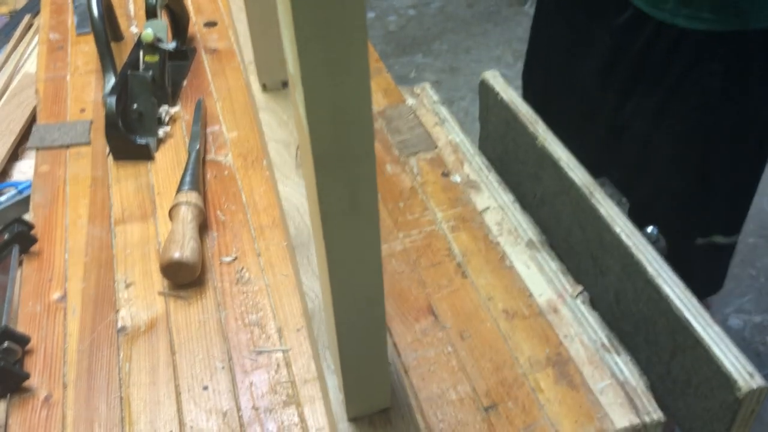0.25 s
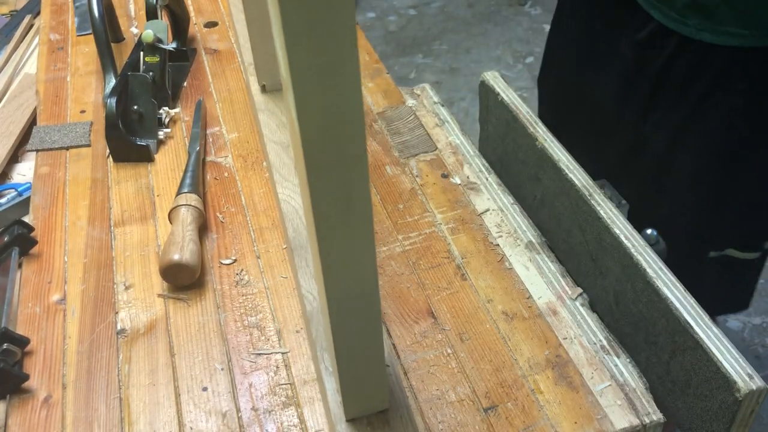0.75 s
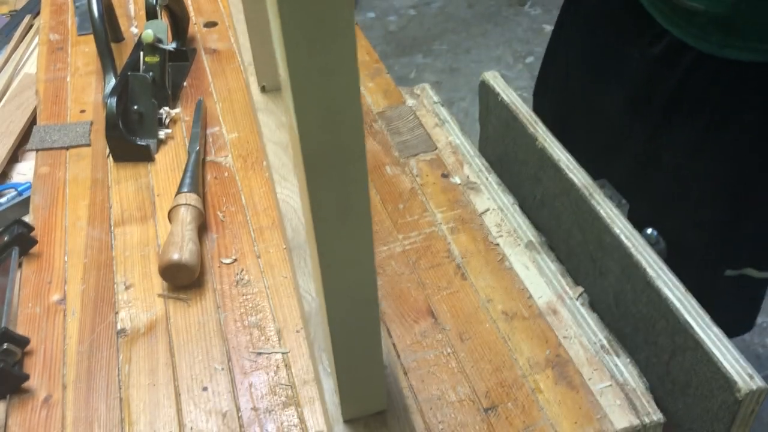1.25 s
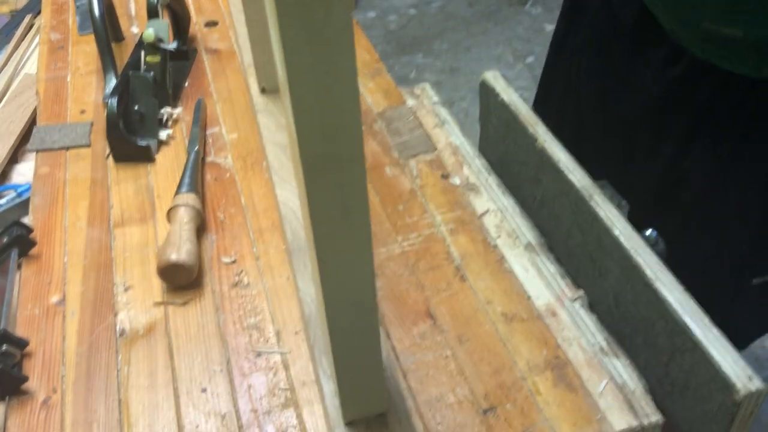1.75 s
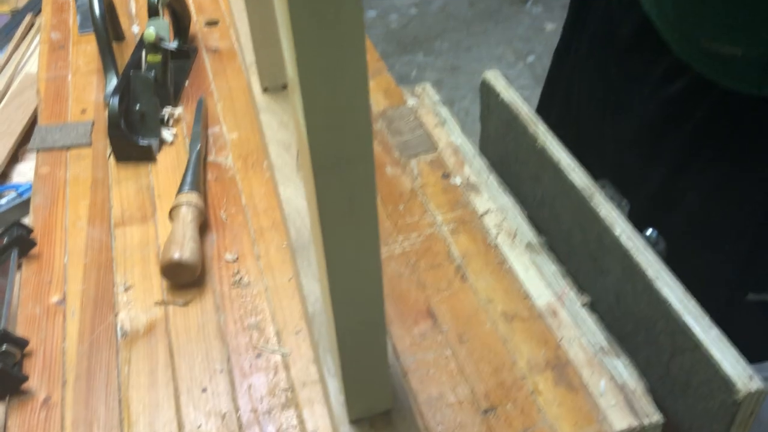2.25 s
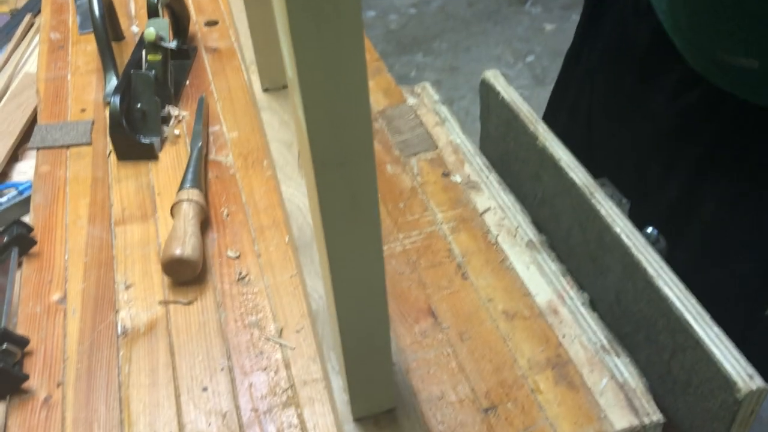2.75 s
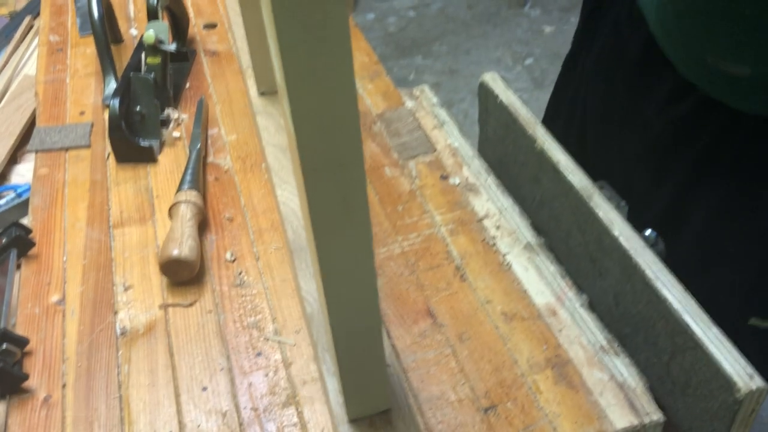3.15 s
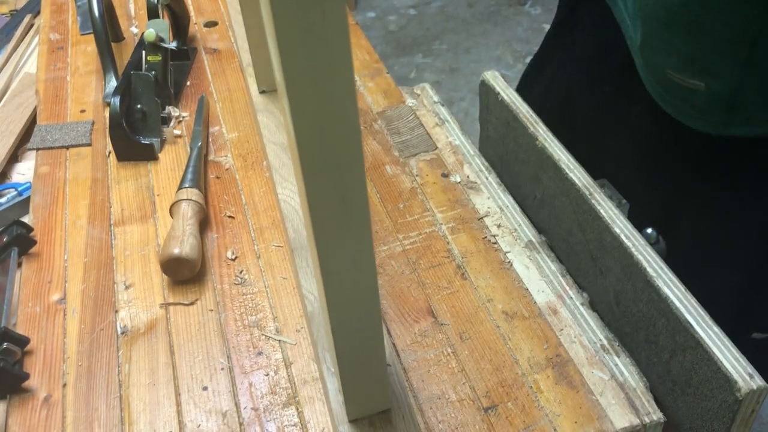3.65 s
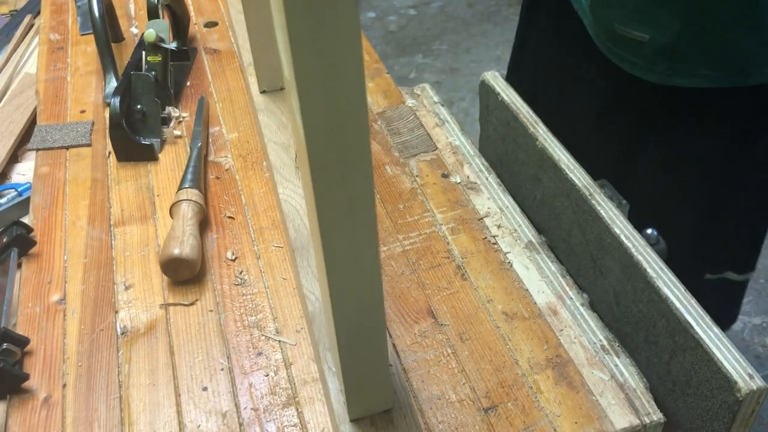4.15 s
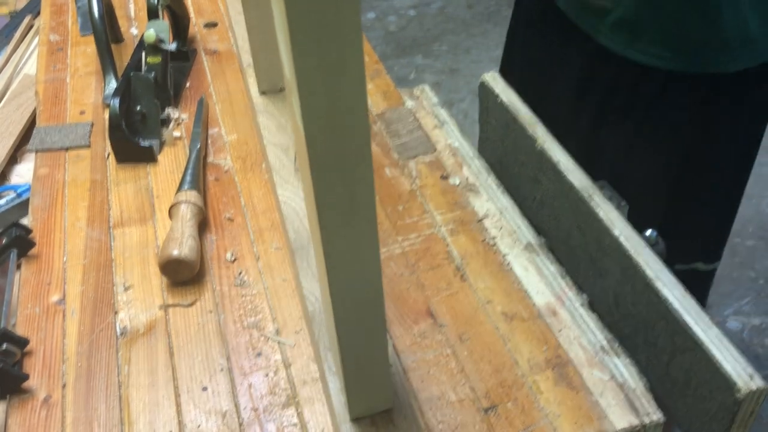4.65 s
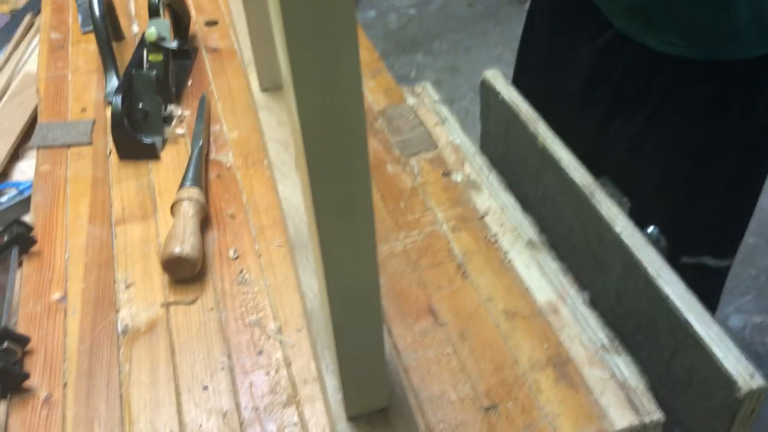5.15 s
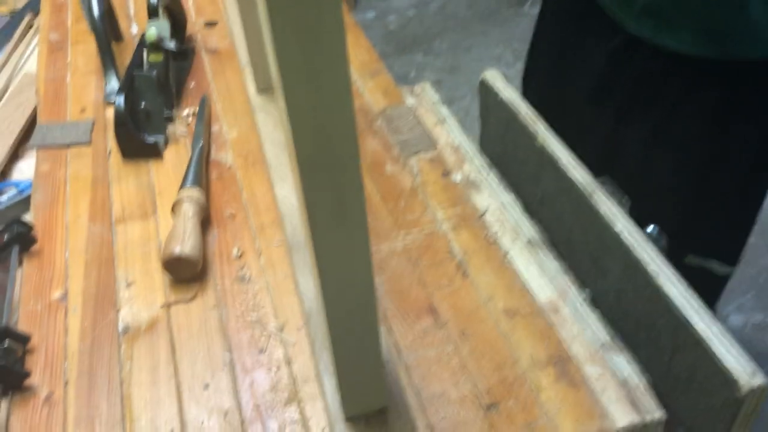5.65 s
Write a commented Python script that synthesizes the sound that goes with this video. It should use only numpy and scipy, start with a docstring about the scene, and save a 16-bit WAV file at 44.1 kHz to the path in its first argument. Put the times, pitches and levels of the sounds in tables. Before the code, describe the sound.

A wooden mallet knocks a frame joint together on a workbench: six sharp blows, a pause, a lighter tap and two more.

```python
"""Mallet blows in a small workshop

A wooden mallet drives the joint of a frame on a workbench: a run of blows, a pause, a light tap
and two more. Each blow cracks, rings the frame, makes the bench boom, jolts the steel tools on it
and fills the room. Between blows, handled wood ticks faintly over soft air and a fan's hum.
The close microphone's limiter flattens the loud start of the blows."""
import sys
import numpy as np
from scipy import signal
from scipy.io import wavfile
from scipy.ndimage import uniform_filter1d, minimum_filter1d

SR = 44100
rng = np.random.default_rng(int(sys.argv[2]) if len(sys.argv) > 2 else 0)


def to_wav(sig):
    """Store sig (one row per channel, or 1-D mono) as 16-bit WAV at the path in sys.argv[1].

    Samples outside -1..1 are clipped; the rate is SR.
    """
    pcm = np.clip(np.atleast_2d(sig), -1, 1) * 32767
    pcm = np.round(pcm).astype(np.int16)
    wavfile.write(sys.argv[1], SR, pcm.T)  # frames by channels


N = 259749
RING_SIZE = SR * 3 // 4  # samples in one blow
AGE = np.arange(RING_SIZE) / SR  # seconds since the blow
CUTOFF_HZ = 15900  # top of the treble
BAND_EDGES = 22 * 2 ** (np.arange(25) * .4)
BAND_HZ = np.sqrt(BAND_EDGES[1:] * BAND_EDGES[:-1])
BAND_FILTERS = [signal.butter(2, edges, "band", fs=SR, output="sos")
                for edges in zip(BAND_EDGES, BAND_EDGES[1:])]


# Each blow and how strongly things answer it; levels in all tables are relative:
# (time [s], force [dB], frame knock [dB], sizzle of loose things [dB], crack [dB], steel ring [dB])
BLOWS = [(-0.17, -3, -5, -9, 0, -12.5), (0.293, -9.5, 9.5, 6, 3.5, -13.5), (1.0067, -10, 10, 4, 5.5, 1.5),
         (1.6785, -4, -0.5, 2, -4.5, 3), (2.176, -4, 0, 5.5, 0, 4), (2.6474, -4, -0.5, 5.5, 3.5, 2.5),
         (3.0999, -5, 4, 5.5, 1, 5), (4.6634, -12, -4.5, 0.5, -2, -12.5), (5.0921, -4, 4, -1, 2.5, -13),
         (5.5688, -2, -0.8, -2, 4, -10)]
def mallet(crack_db, room_db, bench_db, frame_db, jolt_db):
    """Each blow sets off the joint, the frame, the bench, the tools and the room."""
    out = np.zeros(N)
    shared_echoes = noise_bands(ROOM_SPECTRUM, RING_SIZE)
    for start_s, force, knock, sizzle, sharp, steel in BLOWS:
        thud = -0.64 - 0.59 * force  # a lighter blow is duller
        clatter = -3.5 + 0.24 * knock + 0.26 * sizzle  # pitched between knock and sizzle
        wood_colour = [0, 0, knock / 2, clatter / 2, 0]
        joint = crack(contact_s=0.0052, t60=0.031, stiff_hz=7500, colour_db=wood_colour, travel_s=0.0013)
        joint *= from_db(crack_db + sharp)
        frame = from_db(frame_db + knock) * frame_ring()
        bench = from_db(thud) * bench_boom(bench_db, jolt_db)
        tools = from_db(steel) * hopping_tools(hop_s=0.054)
        room = from_db(room_db) * workshop(shared_echoes, [thud, 0, knock, clatter, sizzle], alike=0.44)
        add(out, start_s, from_db(force) * (joint + frame + bench + tools + room))
    return out


# The noise of wood hitting wood: (frequency [Hz], level [dB])
CRACK_SPECTRUM = [(60, -36), (250, -14), (600, 3.5), (1000, -1.5), (1900, 2), (2900, 2), (3900, -3),
                  (5500, -11.5), (8000, -7.5), (12000, -14), (16000, -6.5)]
def crack(contact_s, t60, stiff_hz, colour_db, travel_s):
    """Wood slips briefly on wood. High bending waves run through it fastest and die first."""
    size = SR // 8
    hz = BAND_HZ[:, None]
    delay_s = travel_s * (np.sqrt(1000 / hz) - np.sqrt(1000 / CUTOFF_HZ))
    age = np.maximum(AGE[:size] - delay_s, 0)
    fade = dying(t60, np.maximum(age * (1 + hz / stiff_hz) - contact_s, 0))
    attack = np.minimum(age / 0.00048, 1)
    burst = (noise_bands(CRACK_SPECTRUM, size) * tint(colour_db) * attack * fade).sum(0)
    return np.pad(burst, (0, RING_SIZE - size))


# The notes of the frame's rails: (pitch [Hz], level [dB])
FRAME_NOTES = [(1220, -28.5), (1320, -20), (1422, -23), (1545, -25), (1666, -31.5), (1893, -21),
               (1949, -25), (2030, -26.5), (2137, -28), (2523, -32), (3400, -30)]
def frame_ring():
    """A square blow makes the wooden rails ring."""
    return ring(FRAME_NOTES, spread_db=2.5, blur=0.36, blur_hz=37.5, t60=0.46) * swelling(0, 0.0049)


# The low notes of the bench: (pitch [Hz], level [dB], time to fade by 60 dB [s])
BENCH_NOTES = [(84.3, -19, 0.3), (124.6, -24, 0.15), (140.7, -12, .33), (176.6, -9, 0.38),
               (240.9, -22, 0.15), (269, -47, 1.3), (284, -14.5, .36), (375.3, -23.5, 0.51),
               (449, -18, 0.45), (444, -40, 0.8), (538.4, -18, 0.41), (722.4, -24, 0.56), (778, -23, 0.56),
               (832, -28, 0.41)]
def bench_boom(boom_db, jolt_db):
    """The shock reaches the bench a moment later: it heaves for a cycle or two and booms."""
    boom = ring(BENCH_NOTES, spread_db=0.5, blur=0.35, blur_hz=26) * swelling(0.011, 0.0068)
    jolt_age = np.maximum(AGE - 0.0155, 0)
    jolt = np.sin(2 * np.pi * 135.5 * jolt_age) * dying(0.049, jolt_age)
    return from_db(boom_db) * boom + from_db(jolt_db) * jolt


# The notes of a steel plane and chisel: (pitch [Hz], level [dB])
TOOL_NOTES = [(2283, -26), (2805, -29), (3246, -28), (3786, -16.5), (4328, -31), (4700, -30), (7257, -19.5),
              (8170, -29), (8330, -27), (10584, -28), (11488, -33), (12441, -29), (13260, -32)]
def hopping_tools(hop_s):
    """The tools ring a little as they are thrown up, and fully as they land hop_s later."""
    hop = 0.35 * swelling(0.012, 0.005) + 0.65 * swelling(hop_s, 0.005)
    return ring(TOOL_NOTES, spread_db=1.5, blur=0.7, blur_hz=90, t60=0.36) * hop


# The blow as the room sends it back: (frequency [Hz], level [dB])
ROOM_SPECTRUM = [(25, -34), (55, -19), (90, -2.5), (150, 1), (300, 1), (750, -0.5), (1400, -4.5),
                 (2000, -6.5), (2600, -9.5), (3600, -9.5), (5200, -17), (8000, -22), (11500, -29),
                 (16000, -28)]
# How long the echoes last: (frequency [Hz], time to fade by 60 dB [s])
ROOM_FADE = [(80, 0.32), (210, 0.39), (560, 0.43), (1500, 0.43), (3900, 0.4), (8000, 0.34), (15000, 0.26)]
def workshop(shared_echoes, colour_db, alike):
    """Dense echoes, partly the same for every blow, build up (the bass last) and die away."""
    fresh_echoes = noise_bands(ROOM_SPECTRUM, RING_SIZE)
    echoes = np.sqrt(alike) * shared_echoes + np.sqrt(1 - alike) * fresh_echoes
    build = np.array([swelling(0.0017, 0.0079 * (1 + 100 / hz)) for hz in BAND_HZ])
    fade = dying(at_hz(ROOM_FADE, BAND_HZ)[:, None])
    return (echoes * tint(colour_db) * build * fade).sum(0)


# Light touches on the wood: (time [s], level [dB], length of contact [s])
TICKS = [(2.056, -60, .002), (3.579, -53, 0.0039), (3.861, -65.5, 0.041)]
def handling(room_db):
    """Handled wood gives small, dry ticks and scuffs with a trace of echo."""
    out = np.zeros(N)
    for start_s, db, contact_s in TICKS:
        tick = crack(contact_s, t60=0.043, stiff_hz=15000, colour_db=[0, -2, -21, 1.5, -2], travel_s=0)
        echo = from_db(room_db) * noise_bands(CRACK_SPECTRUM, RING_SIZE).sum(0) * dying(0.31)
        add(out, start_s, from_db(db) * (tick + echo))
    return signal.sosfilt(signal.butter(2, 3000, "high", fs=SR, output="sos"), out + 1e-18)


# The fan's two tones: (pitch [Hz], average level [dB])
FAN_TONES = [(134, -62.5), (237, -69.5)]
def fan(waver_db):
    """A fan hums, each tone drifting louder and softer at random."""
    t = np.arange(N) / SR
    drift_times = np.linspace(0, N / SR, 50)
    hum = np.zeros(N)
    for hz, db in FAN_TONES:
        drift = np.interp(t, drift_times, rng.standard_normal(len(drift_times)))
        hum += np.sqrt(2) * from_db(db + waver_db * drift) * np.sin(2 * np.pi * hz * t)
    return hum


# The workshop's steady air: (frequency [Hz], level [dB])
AIR_SPECTRUM = [(25, -17), (54, -12.5), (128, -4.5), (200, -17), (260, -14.5), (415, -19), (700, -30),
                (1150, -34.5), (2130, -41.5), (5000, -46.5), (15000, -56.5)]
def air(level_db):
    """Air makes a soft, low rush."""
    return from_db(level_db) * noise_bands(AIR_SPECTRUM, N).sum(0)


# The middles of five ranges, called thud, body, knock, clatter and sizzle: (frequency [Hz])
RANGES_HZ = [150, 700, 1600, 3300, 8000]
def tint(colour_db):
    """Turn five levels, from thud to sizzle, into a gain for each band."""
    return from_db(at_hz(list(zip(RANGES_HZ, colour_db)), BAND_HZ))[:, None]


def ring(notes, spread_db, blur, blur_hz, t60=None):
    """Fading notes. A share of each (blur) arrives by many paths and so wavers."""
    out = np.zeros(RING_SIZE)
    for hz, db, *own_t60 in notes:
        scatter = rng.standard_normal((100, 2)) @ [1, 1j] / np.sqrt(2)  # random strength and phase
        paths = np.sqrt(1 - blur) * np.exp(2j * np.pi * rng.random()) + np.sqrt(blur) * scatter
        waver = np.interp(AGE * blur_hz, np.arange(len(paths)), paths)
        wave = (waver * np.exp(2j * np.pi * hz * AGE)).real
        gain = from_db(db + spread_db * rng.standard_normal())
        out += gain * dying(t60 or own_t60[0]) * wave
    return out


def noise_bands(spectrum, size):
    """Noise shaped by a spectrum, one row per frequency band; the sum has strength (rms) 1."""
    run_in = SR // 10  # lets the filters settle
    white = rng.standard_normal((2, size + run_in))
    bands = np.array([signal.sosfilt(sos, white[k % 2])[run_in:] for k, sos in enumerate(BAND_FILTERS)])
    bands *= from_db(at_hz(spectrum, BAND_HZ))[:, None]
    return bands / bands.sum(0).std()


def from_db(db):
    """Turn decibels into a gain to multiply by."""
    return 10 ** (np.asarray(db) / 20)


def at_hz(points, hz):
    """Read between a table's rows, with octaves evenly spaced."""
    row_hz, value = np.transpose(points)
    return np.interp(np.log(hz), np.log(row_hz), value)


def dying(t60, age=AGE):
    """A fade that drops 60 dB every t60 seconds."""
    return np.exp(-np.log(1000) * age / t60)


def swelling(start_s, rise_s):
    """Silence until start_s, then a smooth rise to one."""
    return 1 - np.exp(-np.maximum(AGE - start_s, 0) / rise_s)


def add(track, start_s, sound):
    """Mix a sound into the track, dropping what falls outside it."""
    at = round(start_s * SR)
    first, last = max(at, 0), min(at + len(sound), N)
    track[first:last] += sound[first - at:last - at]


def scene():
    """Blows, handled wood, fan and air in one channel."""
    blows = mallet(crack_db=5.5, room_db=-1.1, bench_db=1.5, frame_db=1.5, jolt_db=-1.0)
    return (blows + handling(room_db=-18) + fan(waver_db=4.0) + air(level_db=-56.5))[None]


def limiter(x, ceiling_db, release_db_per_s):
    """Turns the sound down a millisecond before each loud peak, then steadily back up."""
    ahead = SR // 1000
    over_db = np.maximum(20 * np.log10(np.abs(x) + 1e-9) - ceiling_db, 0)
    ramp = release_db_per_s * np.arange(N) / SR
    cut_db = np.maximum.accumulate(over_db + ramp, axis=-1) - ramp
    early_gain_db = minimum_filter1d(-cut_db, 2 * ahead + 1)
    return x * from_db(uniform_filter1d(early_gain_db, ahead))


def record(dry):
    """The microphone rounds and limits the tallest peaks and cuts the deepest bass and top treble."""
    top = from_db(10)
    treble_cut = signal.ellip(10, .1, 80, CUTOFF_HZ, fs=SR, output="sos")
    bass_cut = signal.butter(3, 55, "high", fs=SR, output="sos")
    rounded = signal.sosfilt(treble_cut, top * np.tanh(dry / top))
    limited = limiter(rounded, ceiling_db=-5.0, release_db_per_s=404)
    return signal.sosfilt(np.vstack([bass_cut, treble_cut]), limited)


dry = scene()
out = record(dry)
to_wav(out)
```